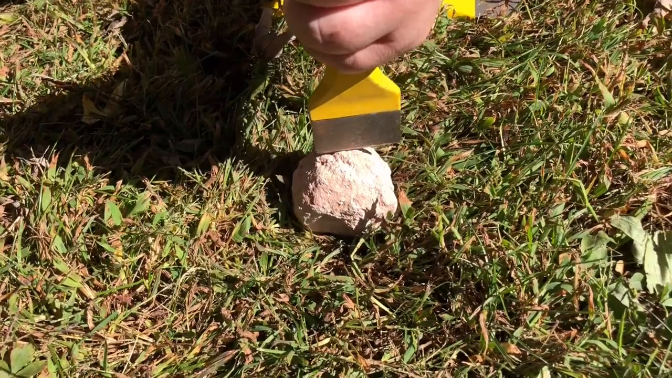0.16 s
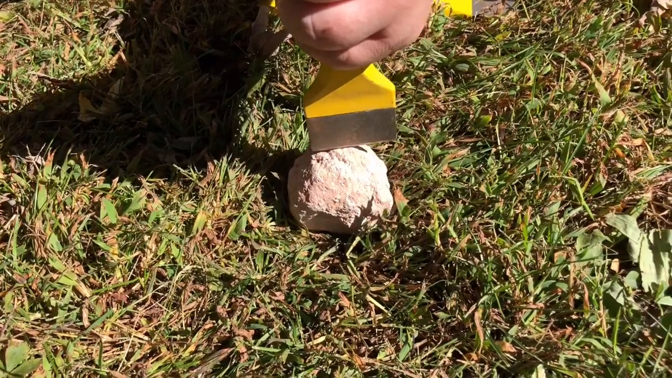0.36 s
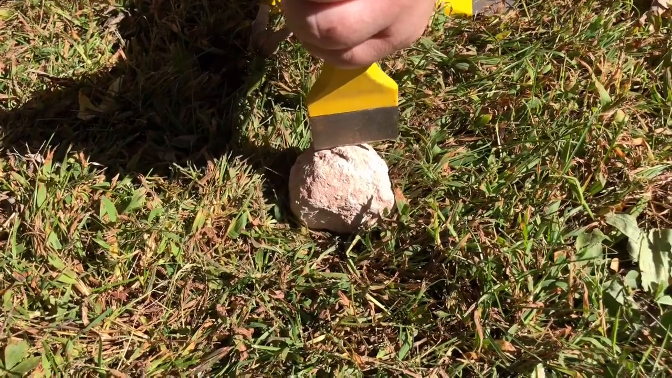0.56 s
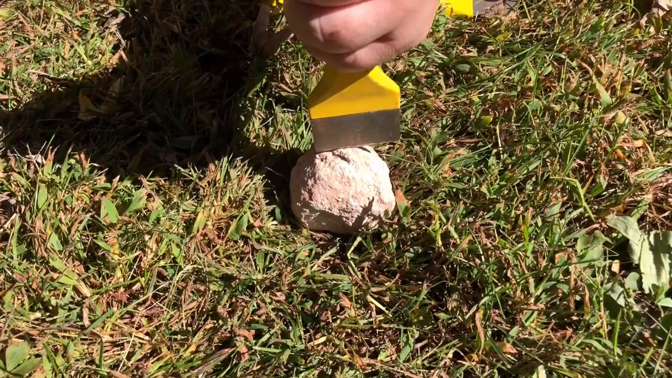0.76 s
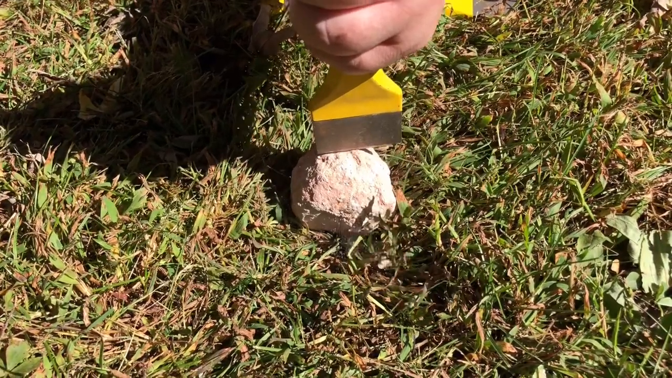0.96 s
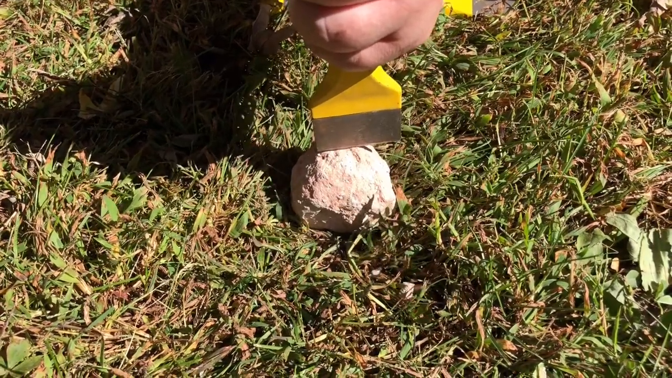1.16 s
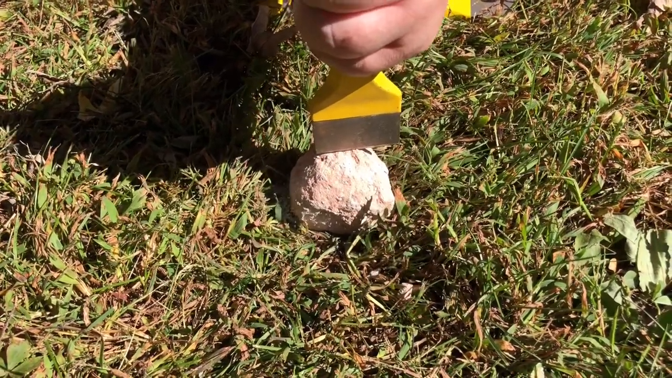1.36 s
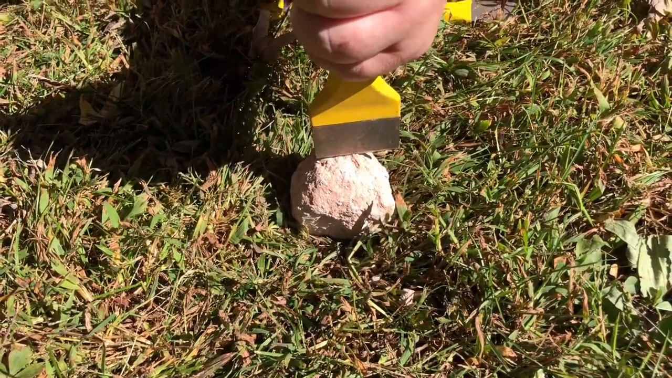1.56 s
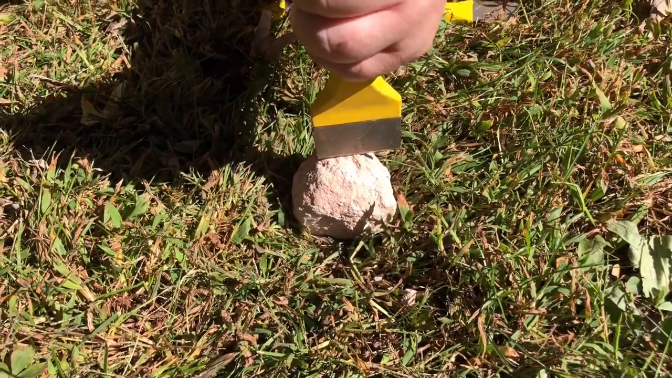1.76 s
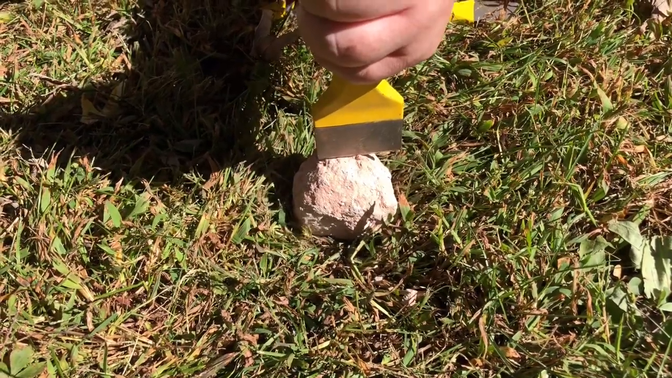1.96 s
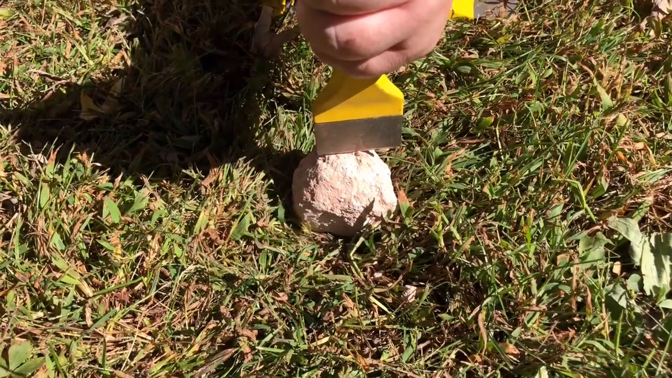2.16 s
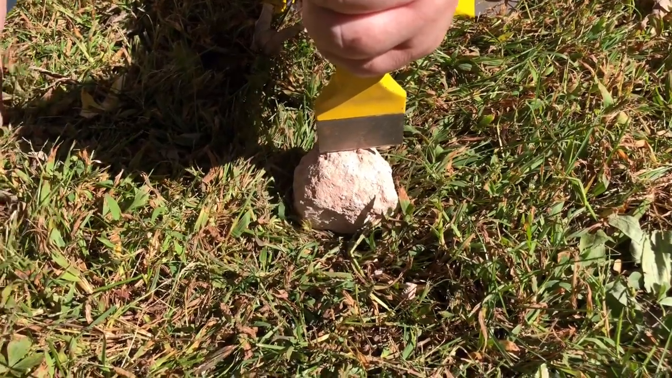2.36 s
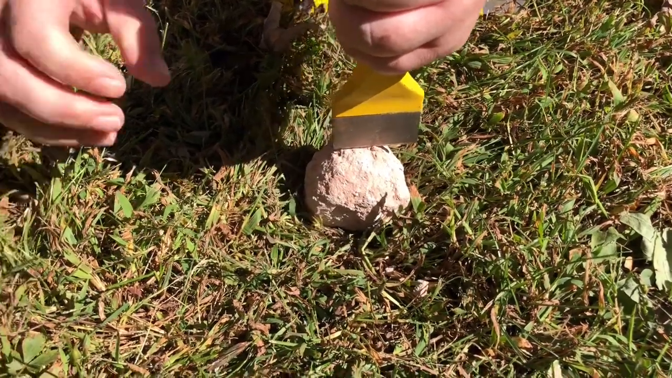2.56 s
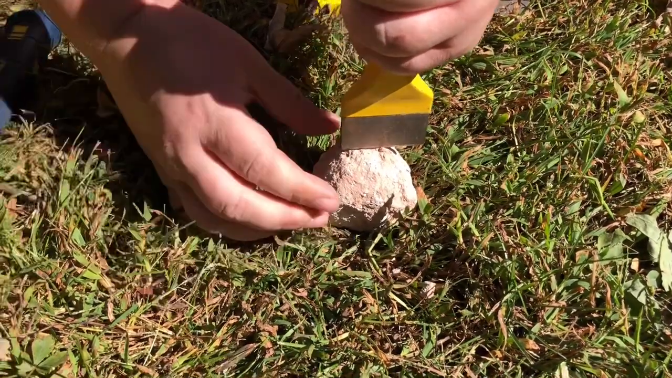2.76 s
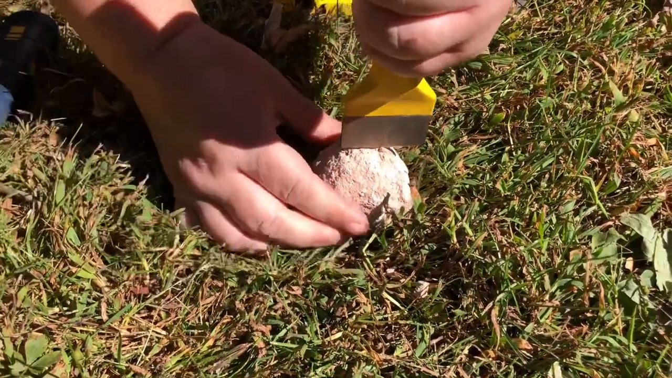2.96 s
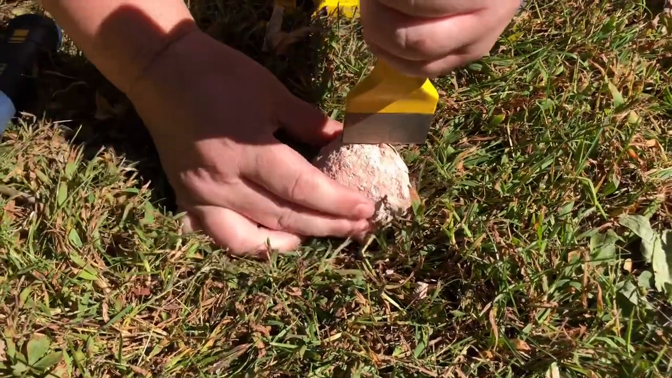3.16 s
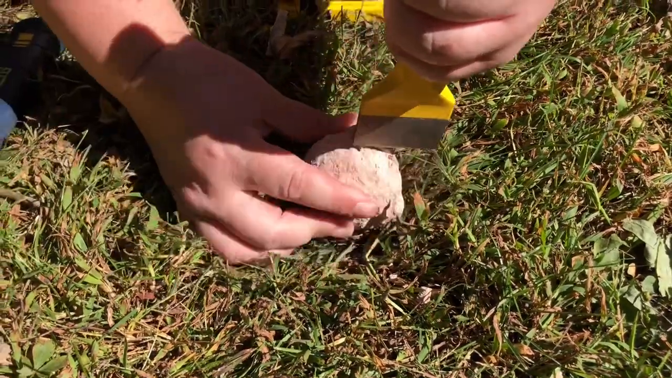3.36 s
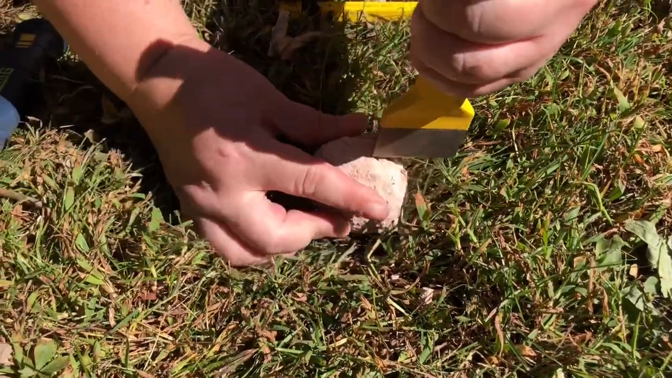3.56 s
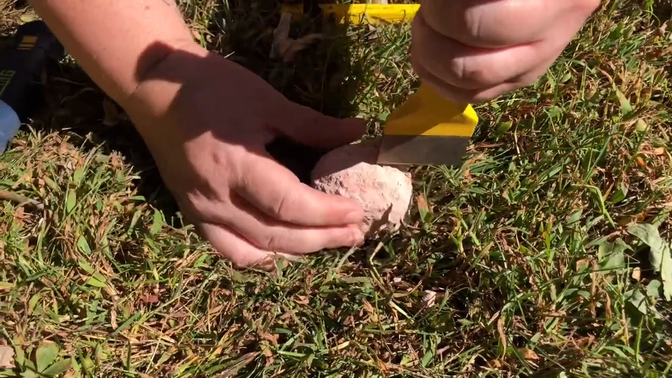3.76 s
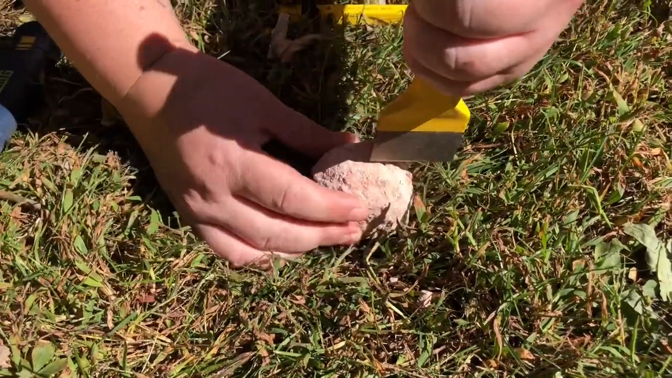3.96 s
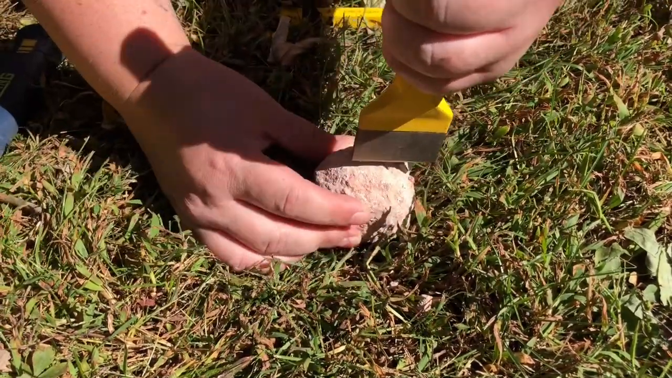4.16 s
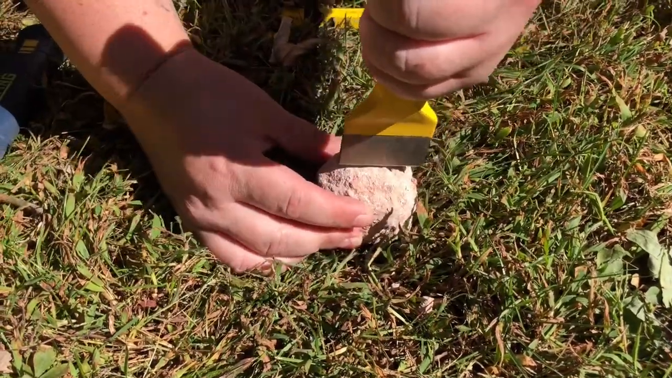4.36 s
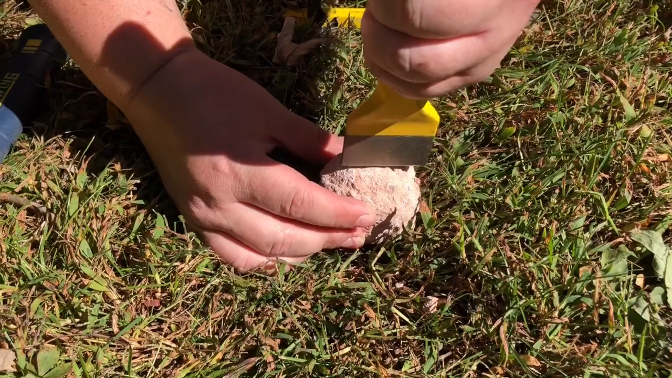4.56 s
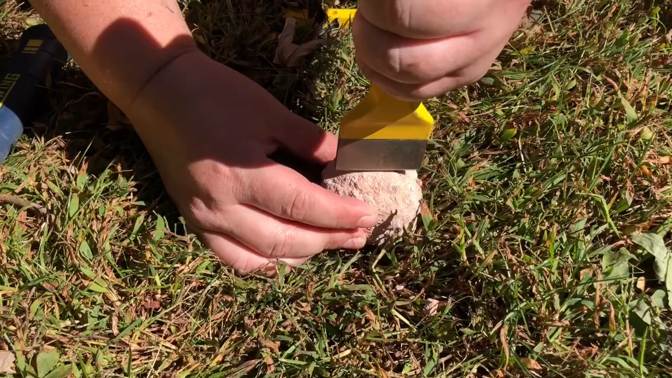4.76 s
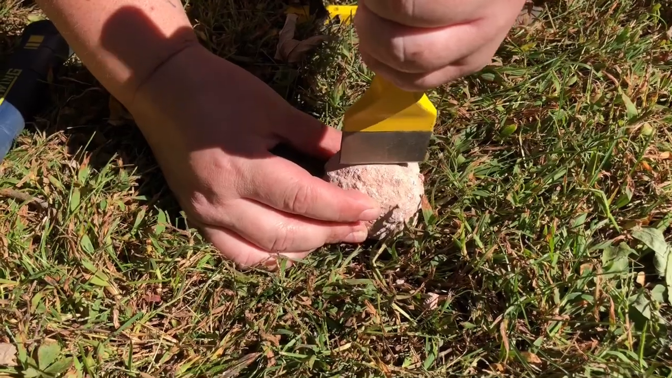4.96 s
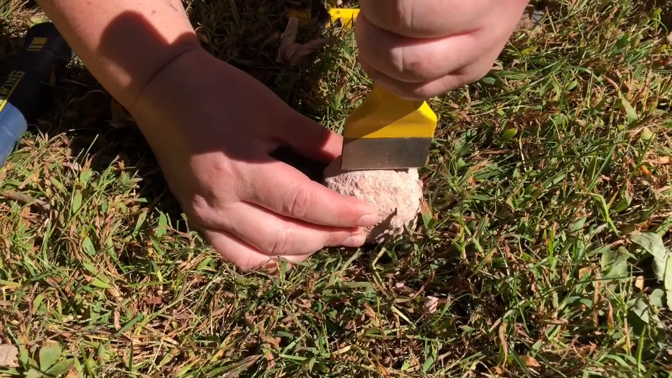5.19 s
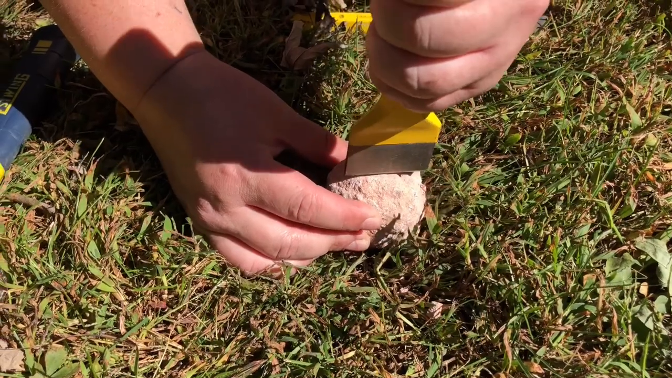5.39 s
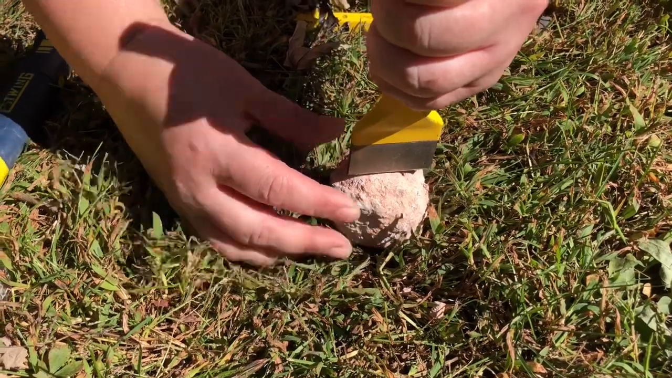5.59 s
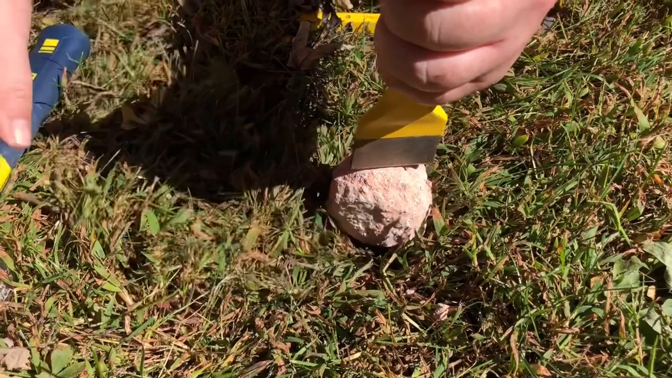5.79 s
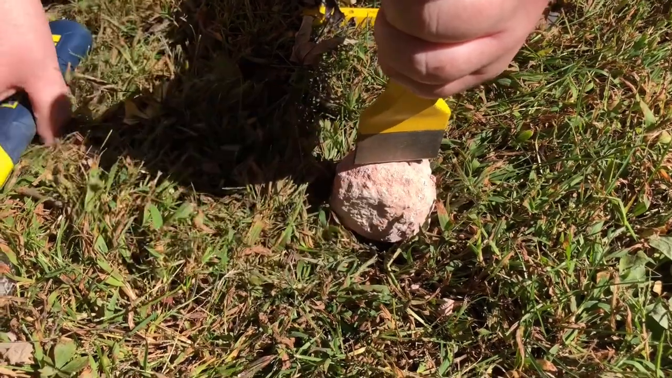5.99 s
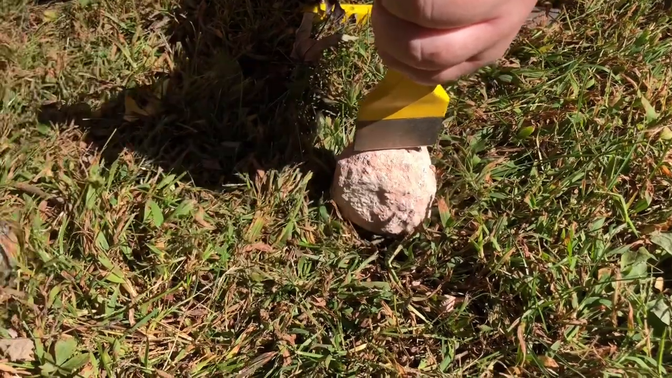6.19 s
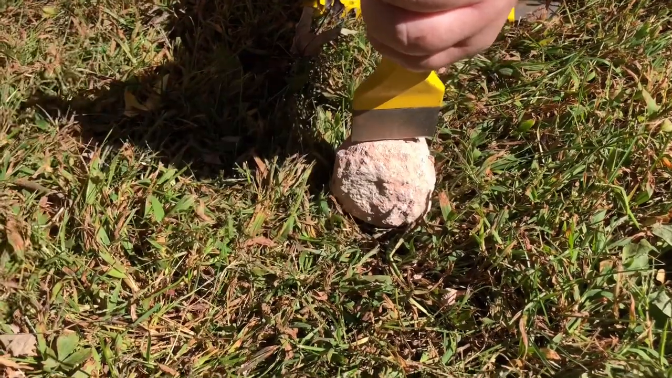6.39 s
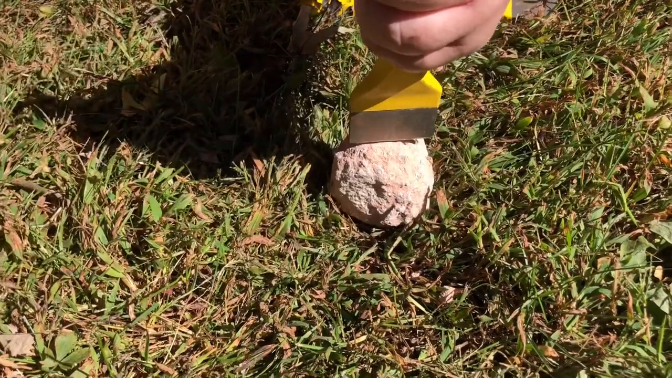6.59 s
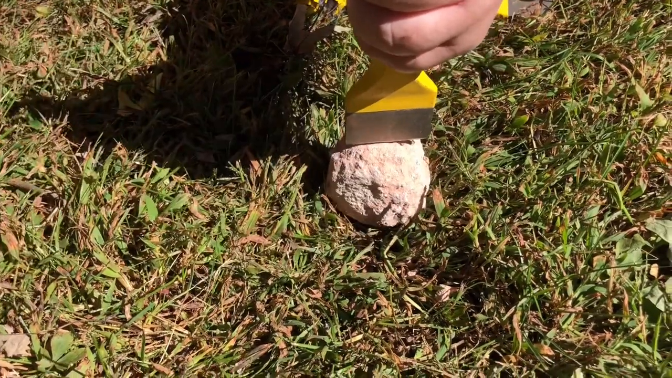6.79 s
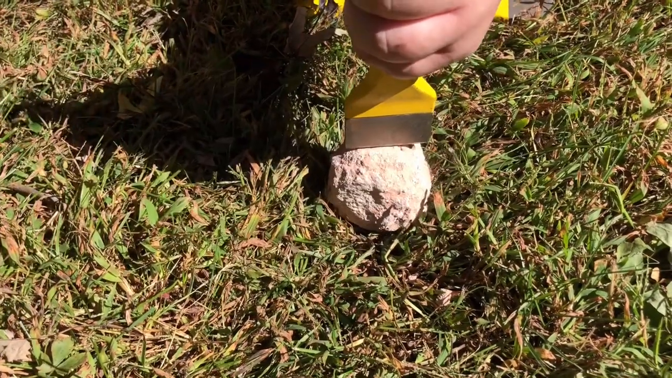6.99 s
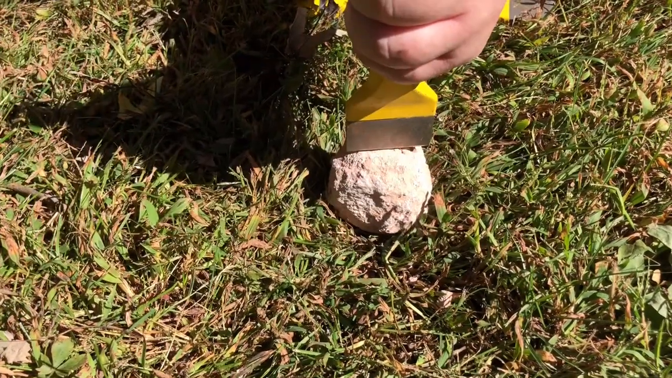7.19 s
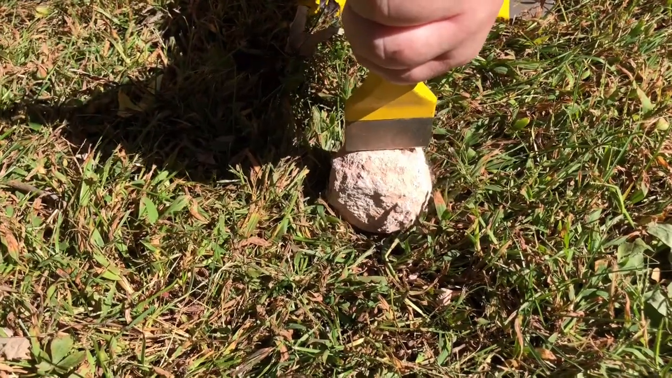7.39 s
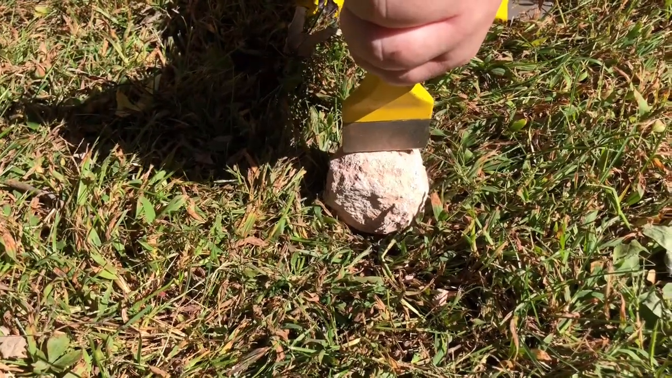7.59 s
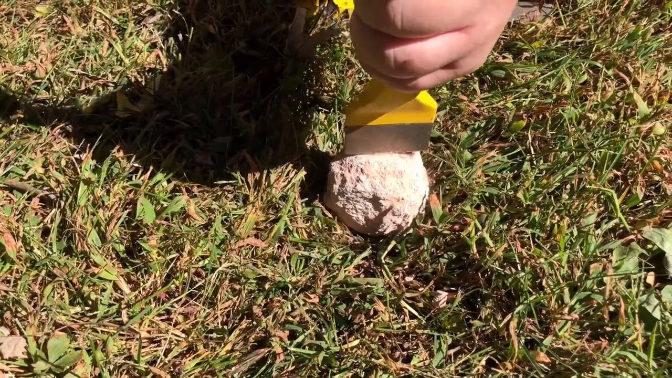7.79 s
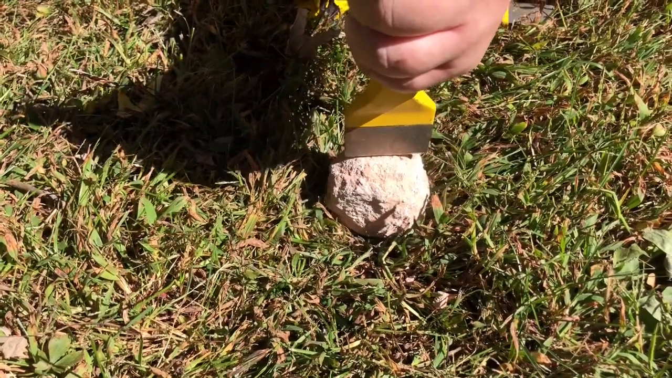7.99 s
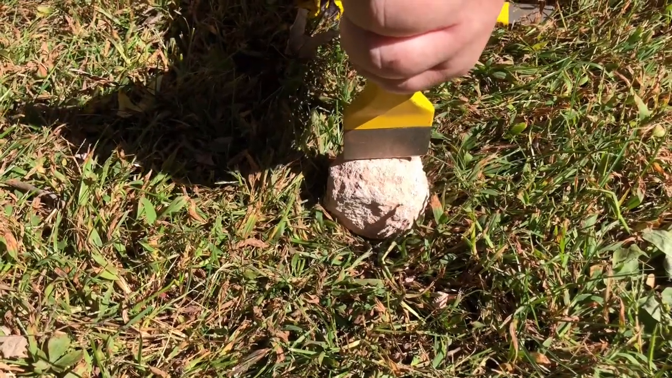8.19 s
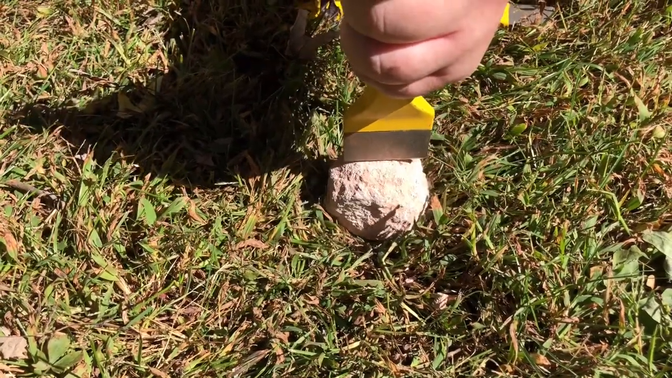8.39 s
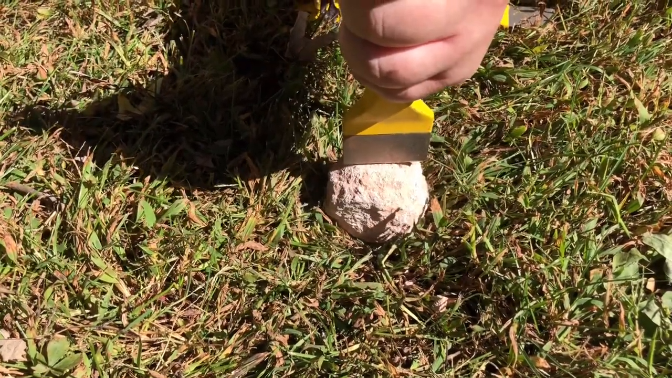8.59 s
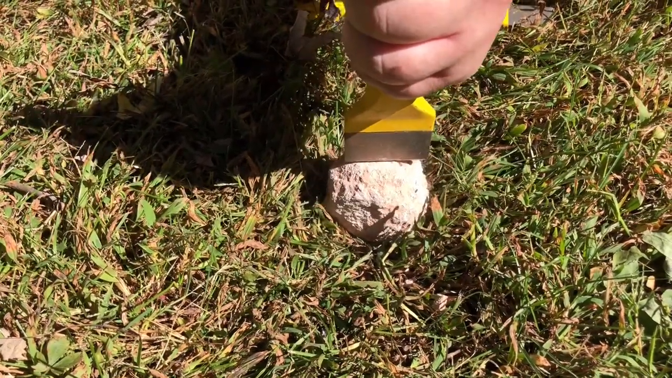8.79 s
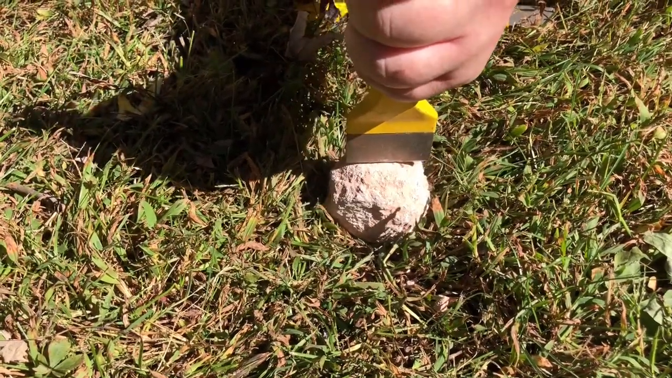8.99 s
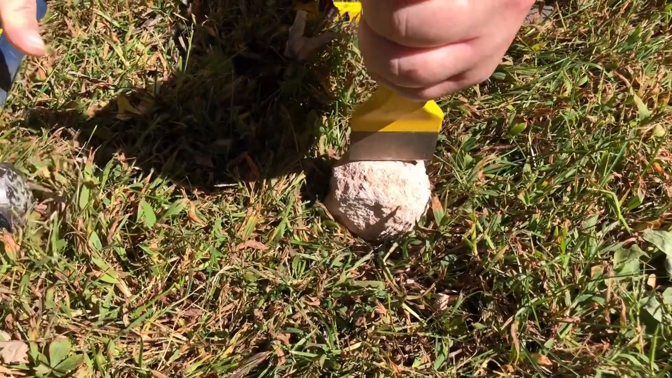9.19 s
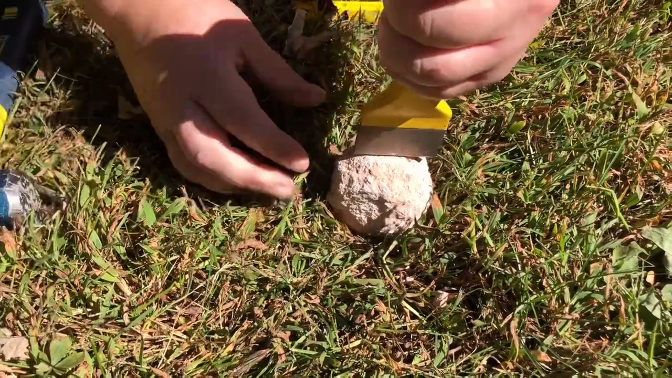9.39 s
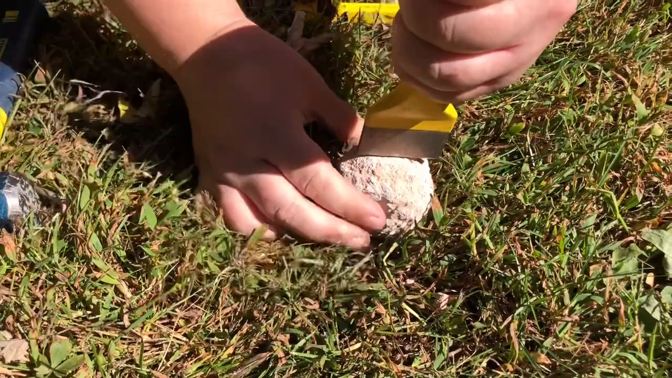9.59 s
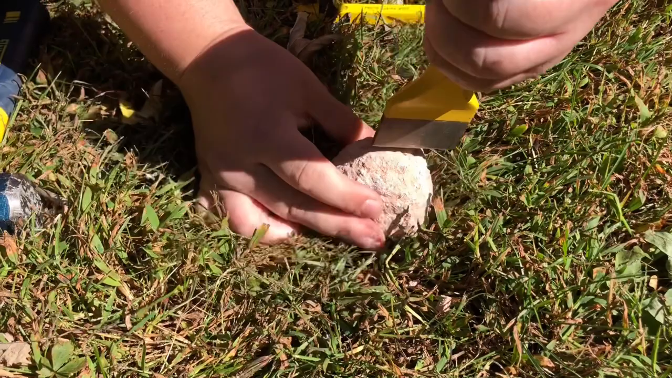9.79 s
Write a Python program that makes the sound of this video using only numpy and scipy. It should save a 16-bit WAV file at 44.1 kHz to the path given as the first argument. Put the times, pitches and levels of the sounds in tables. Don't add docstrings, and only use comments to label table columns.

```python
import sys
import numpy as np
from scipy import signal
from scipy.fft import rfft, irfft
from scipy.io import wavfile
from scipy.ndimage import map_coordinates

SR = 44100
rng = np.random.default_rng(int(sys.argv[2]) if len(sys.argv) > 2 else 0)


def master(y):
    cut = np.clip(np.atleast_2d(y).T, -1, 1)
    pcm = np.round(cut * 32767)
    wavfile.write(sys.argv[1], SR, pcm.astype(np.int16))


def natural_amplitude(level_db):
    exponent = np.asarray(level_db, float) / 20
    return 10 ** exponent


N = 434374

# [f/Hz, level/dB]
TRAFFIC_SPECTRUM = [(20, -39), (35, -25), (55, -8), (105, 0), (190, -8.5), (300, -17), (500, -24),
                    (800, -56)]
# [t/s, level/dB]
TRAFFIC_FLOW = [(0, -45), (.6, -45), (.9, -49), (3.2, -47), (3.65, -53), (4.05, -48.5), (4.6, -47),
                (5.7, -51), (6.2, -47), (7.2, -45.5), (8.4, -48), (9.85, -46)]
# [f/Hz, level/dB]
AIR_SPECTRUM = [(200, -1), (500, 0), (1600, -1.5), (4400, -8), (8000, -6.5), (10000, -26), (12200, -25),
                (13000, -20.5), (13900, -25), (16500, -23.5)]
# [f/Hz, level/dB]
INSECT_SPECTRUM = [(5000, -28.5), (5700, -13.5), (5950, -2.5), (6500, -0.5), (7200, -4), (8200, -16),
                   (8600, -30.5), (9500, -36.5)]
# [t/s, firing f/Hz, level/dB]
ENGINE = [
    (5.9, 135.2, -64),
    (6.15, 131.6, -47.5),
    (6.5, 124, -53),
    (6.75, 106.8, -51.5),
    (7.0, 113.2, -51),
    (7.4, 120.6, -42),
    (7.6, 121.8, -51.5),
    (7.85, 118, -61.5),
]
# [f/Hz, level/dB, start t/s, end t/s]
WHINES = [
    (1314, -71, 0, 4.0),
    (1104, -73, 1.5, 5.5),
    (2290, -71, 3.0, 3.55),
    (2900, -67, 5.18, 5.38),
    (2150, -68, 5.42, 5.7),
    (345, -63, 9.0, 10),
    (2900, -65, 9.75, 10),
]

# [f/Hz, level/dB]
GRASS_SPECTRUM = [(400, -13), (1500, -6.5), (4000, -3), (8000, -5), (12000, 0), (15500, 0), (16500, -17.5)]
# [t/s, held/s, level/dB, swell time per 20 dB/s, fade time per 20 dB/s]
SWEEPS = [(2.405, .2, -52, .03, .04), (2.44, .015, -43.5, .05, .05), (2.62, .1, -64, .02, .02),
          (2.83, .1, -65, .03, .3), (2.91, .05, -63, .2, .5), (3.215, .012, -68, .1, .03),
          (3.51, .03, -57, .2, .07), (3.7, .4, -72, .4, 3), (4.475, .006, -67, .02, .04),
          (4.752, .006, -62, .01, .06), (4.6, 1.0, -76, .5, .3), (5.16, .01, -59, .01, .015),
          (5.75, .05, -58.5, .15, .25), (5.9, .025, -61, .2, .025), (6.03, .06, -52, .04, .3),
          (6.15, .12, -55, .2, .2), (6.3, .14, -52, .3, .08), (9.282, .012, -41, .025, .06),
          (9.26, .01, -57, .03, .03), (9.37, .015, -47, .06, .07), (9.49, .02, -60, .05, .08),
          (9.57, .1, -56, .15, .1), (9.77, .07, -64, .05, .05)]
# [f/Hz, level/dB]
STEM_SPECTRUM = [(1500, -28), (3300, 11), (5000, -10), (6800, -2), (9000, -9), (14000, -4), (16500, 1)]
# [t/s, level/dB, t60/s]
SNAPS = [
    (1.2805, -30, 0.013),
    (2.452, -54, .02),
    (2.72, -51, 0.0038),
    (3.213, -51, .006),
    (4.018, -41, .012),
    (4.7525, -52, .006),
    (6.289, -41.5, 0.0032),
    (6.375, -43, 0.0028),
    (9.2835, -41, .02),
    (9.772, -45, .006),
]
# [t/s, level/dB]
SET_DOWN = [
    (2.359, -49),
    (9.308, -29),
    (9.382, -32),
]

# [t/s, length/s, level/dB, lowest mode level/dB, brightness/dB]
TOUCHES = [
    (2.479, .025, -48.5, -14, -14),
    (3.213, .004, -51, -15.5, -2.1),
    (3.509, 0.054, -46, -12, -14),
    (4.07, 0.033, -56, -3, -7),
    (4.7515, 0.038, -45.5, -5, -5),
    (5.159, .014, -42, -4, -4),
    (6.045, .06, -56, -14, -16),
    (9.772, .004, -50, -8, -4),
    (9.798, .003, -63, -10, -11),
    (9.84, .004, -59, -6, -10),
]
# [f/Hz, t60/s]
BLADE_LOW_MODE = (1870, 0.038)
# [f/Hz, level/dB, t60/s]
BLADE_MODES = [(3735, 4.5, 0.025), (7150, -2.5, .04)]
# [f/Hz, level/dB, t60/s]
BLADE_TOP_MODES = [(8825, -10, .06), (11540, -5, .05), (12640, -16, .15), (14020, -8, .04)]
# [f/Hz, level/dB, t60/s]
STONE_MODES = [(2600, -6, .012), (4150, 0, .01), (4600, -2, .01), (5200, -2, .01)]

# [f/Hz, level/dB]
WALL_SPECTRUM = [(500, -10), (1400, -1.1), (1820, 11), (2300, 2.5), (3000, 7), (4200, -2.5), (5350, 3.5),
                 (6000, -8), (9000, 1.1), (10300, 1.5), (12200, -6), (12680, -18), (14580, -12),
                 (16000, -9)]
# [lag/s, t60/s, level/dB]
ECHOES = [(.012, .2, -41), (0.0415, .03, -29.5), (0.0481, .04, -30.5), (.06, .05, -46), (0.108, .05, -45.5)]
# [f/Hz, level/dB, t60/s, lag/s]
ECHO_BOOM = (1820, -35, .055, .044)

# [f/Hz, level/dB, t60/s]
SOIL_MODES = [(90, 6, .085), (175, -7, .03), (330, -15, .04), (447, -13, .09)]
# [t/s, strength/dB, steel ring over grit/dB, soil thump/dB, gain dip/dB]
BLOWS = [
    (0.0433, -9.5, 5, -27, 0.5),
    (0.5056, -8, 5.5, -21.5, -10),
    (0.9765, -9, 6.5, -22, -7),
    (1.442, -1.5, -2.1, -20, -4),
    (1.9223, -1.5, 2.1, -17.5, -17),
    (7.0552, -10, 2.5, -35, -1),
    (7.4861, -7, 2.2, -22.5, -12),
    (7.9437, -2.5, 3, -19.5, -8),
    (8.3938, -2.1, -4, -15.5, -8),
    (8.8374, -1.1, 3, -13.5, -13),
]
# [rebound lag/ms, rebound/dB, face ring/dB, face overtone/dB]
RECOILS = [
    (8.7, -10, -22.5, -85),
    (3.9, -2.1, -25.5, -41),
    (3.9, -2.1, -23.5, -51),
    (3.8, -18, -31, -33),
    (3.92, -2.1, -27, -48),
    (1.9, -2.1, -30.5, -47),
    (3, -2.5, -26, -39),
    (3.5, -8.5, -20.5, -43),
    (1.7, -2.1, -16.5, -24),
    (1.3, -7, -27, -36),
]
# [f/Hz, level/dB, t60/s]
GRIPPED_MODES = [(5170, -4, .03), (5400, -2, .035), (5620, -8, .025), (7150, -10, .03), (10250, -14, .03),
                 (11600, -18, .03), (12690, -6.5, .03), (14620, -21, .03)]
# [f/Hz, level/dB, t60/s]
FREE_MODES = [(12680, 10, .115), (12720, 4, .1), (14580, 11, .11), (8830, 4, .25)]
# [f/Hz, level/dB]
GRIT_SPECTRUM = [(1200, -21), (2300, -2), (3500, -0.5), (5300, 2), (6500, -2), (8500, -15.5), (13000, -13),
                 (16000, -33.5)]
# [f/Hz, level/dB]
KNOCK_SPECTRUM = [(150, -24), (330, -16), (620, -23), (800, -10), (1000, -6), (1800, -8), (2600, -9.5),
                  (4000, -31.5)]

# [t/s, gain/dB]
GAIN_RIDE = [(0, 0), (.9, 0), (1.12, -2), (1.7, -4.5), (2.03, -3), (2.27, -4), (3.1, -1.5), (5.2, -1.1),
             (5.7, 0), (7.42, 0), (7.6, -3), (8.18, -6), (9.27, -5), (9.5, -2.1), (9.85, 0)]
# [lag/blocks of 512 samples, level/dB]
GHOSTS = [(-2, -30.5), (-1, -35), (2.6, -37.5)]


def in_time(rows):
    s, *columns = np.transpose(rows)
    return [np.interp(np.arange(N) / SR, s, c) for c in columns]


def rms_one(x):
    return x / np.sqrt(np.mean(x ** 2) + 1e-20)


def colour(x, spectrum):
    hz, db = np.transpose(spectrum)
    grid_hz = np.arange(2049) * SR / 4096
    log_gain = np.log(natural_amplitude(np.interp(np.log(grid_hz + 1), np.log(hz), db)))
    cepstrum = irfft(log_gain)
    cepstrum[1:2048] *= 2
    cepstrum[2049:] = 0
    response = irfft(np.exp(rfft(cepstrum)))
    return signal.oaconvolve(x, response)[:len(x)]


def drift(rate_hz):
    knots = rng.standard_normal(1200)
    return map_coordinates(knots, [np.arange(N) / SR * min(rate_hz, 100) + 2], order=3)


def modes(table, scatter_db, detune=0., size=8192):
    hz, db, t60 = np.transpose(table)[:, :, None]
    t = np.arange(size) / SR
    strength, pitch, sign = rng.standard_normal((3, len(table), 1))
    hz = hz * (1 + detune * pitch)
    envelope = natural_amplitude(db + scatter_db * strength - 60 * t / t60)
    return np.sum(np.sign(sign) * envelope * np.sin(2 * np.pi * hz * t), axis=0)


def burst(spectrum, envelope):
    puff = colour(rng.standard_normal(len(envelope)), spectrum) * envelope
    pulse = colour(np.arange(len(envelope)) == 0, spectrum)
    energy = np.linalg.norm(envelope)
    return np.array([v * energy / np.linalg.norm(v) for v in (puff, pulse)])


def add(track, s, sound):
    i = round(s * SR)
    track[i:i + len(sound)] += sound[:N - i]


def background():
    air_db, insects_db = -55, -58.5
    t = np.arange(N) / SR
    traffic_db, = in_time(TRAFFIC_FLOW)
    white = rng.standard_normal((3, N))
    traffic = natural_amplitude(traffic_db + 1 + 0.5 * drift(8)) * rms_one(colour(white[0], TRAFFIC_SPECTRUM))
    air = natural_amplitude(air_db + 0.47 * drift(10)) * rms_one(colour(white[1], AIR_SPECTRUM))
    insects = natural_amplitude(insects_db + 0.7 * drift(35)) * rms_one(colour(white[2], INSECT_SPECTRUM))

    firing_hz, engine_db = in_time(ENGINE)
    phase = 2 * np.pi * np.cumsum(firing_hz * (1 + 0.015 * drift(9.2))) / SR
    engine = np.sin(phase) + natural_amplitude(-10) * np.sin(2 * phase)
    engine = engine * natural_amplitude(engine_db + 0.5 + 0.89 * drift(14))

    whines = np.zeros(N)
    for hz, db, start, end in WHINES:
        level = natural_amplitude(db + 2.5 + 3.1 * drift(15))
        gate = np.clip(np.minimum(t - start, end - t) / 0.065, 0, 1)
        whines += level * gate * np.sin(2 * np.pi * hz * t + 1.9 * drift(10))
    return traffic + air + insects + engine + whines


def soil(db):
    t = np.arange(8192) / SR
    swing = sum(natural_amplitude(g - 60 * t / t60) * np.sin(2 * np.pi * hz * t) for hz, g, t60 in SOIL_MODES)
    return natural_amplitude(db) * swing * (1 - np.exp(-t / 0.0015))


def grass():
    t = np.arange(N) / SR
    power = np.zeros(N)
    for s, held, db, swell, fade in SWEEPS:
        before, after = np.maximum(s - t, 0), np.maximum(t - s - held, 0)
        power += natural_amplitude(db - 20 * before / swell - 20 * after / fade) ** 2

    snaps_per_s = 4000
    sizes = natural_amplitude(4.8 * np.minimum(rng.exponential(1, N), 5)) * rng.choice([-1, 1], N)
    grains = rms_one(sizes * (rng.random(N) < snaps_per_s / SR))
    rustle = rms_one(colour(grains + 1.3 * rng.standard_normal(N), GRASS_SPECTRUM))
    out = np.sqrt(power) * natural_amplitude(2.5 + 1.6 * drift(60)) * rustle

    for s, db, t60 in SNAPS:
        stem = rms_one(colour(rng.standard_normal(2048), STEM_SPECTRUM))
        add(out, s, stem * natural_amplitude(db - 60 * np.arange(2048) / SR / t60))
    for s, db in SET_DOWN:
        add(out, s, soil(db))
    return out


def touches():
    clicks_per_s = 500
    stone_db, stone_db_per_s = 9, -550
    out = np.zeros(N)
    for s, length, db, low_db, bright_db in TOUCHES:
        chance, size = rng.random((2, 4000))
        clicks = (chance < clicks_per_s / SR) * natural_amplitude(-3 - 10 * size)
        clicks = clicks * (np.arange(4000) < length * SR)
        clicks[0] = 1
        low_hz, low_t60 = BLADE_LOW_MODE
        body = modes(BLADE_MODES + [(low_hz, low_db, low_t60)], 1.3, size=4096)
        body += natural_amplitude(bright_db) * modes(BLADE_TOP_MODES, 1.5, size=4096)
        body += natural_amplitude(stone_db + stone_db_per_s * length) * modes(STONE_MODES, 1.4, size=4096)
        add(out, s, natural_amplitude(db) * signal.oaconvolve(clicks, body))
    return out


def yard(x):
    tail_db, tail_t60_s, tail_top_hz = -38, 0.65, 7500
    return_db, flutter_db = -22.5, 0.8
    t = np.arange(SR // 2) / SR
    white = rng.standard_normal((2, SR // 2))
    shape = sum(natural_amplitude(db - 60 * np.maximum(t - lag, 0) / t60) * (t > lag) for lag, t60, db in ECHOES)
    tail = natural_amplitude(tail_db - 60 * (t - 0.045) / tail_t60_s) * (t > 0.043) * white[1]
    tail = signal.lfilter(*signal.butter(1, tail_top_hz, fs=SR), tail)
    response = colour(white[0] * shape + tail, WALL_SPECTRUM)
    hz, db, t60, lag = ECHO_BOOM
    boom_t = t[:4096]
    add(response, lag, natural_amplitude(db - 60 * boom_t / t60) * np.sin(2 * np.pi * hz * boom_t))
    return signal.oaconvolve(x, response * natural_amplitude(return_db))[:N] * natural_amplitude(flutter_db * drift(100))


def blows():
    soil_lag_s = 0.0161
    blade_under_face_db = -40
    knock_db, knock_follows = -13.5, 0.45
    dulling, mean_blow_db = 0.6, -6
    steel, ground = np.zeros((N, 2)), np.zeros(N)
    t = np.arange(8192) / SR
    for (s, db, ring_db, soil_db, dip_db), recoil in zip(BLOWS, RECOILS):
        lag_ms, rebound_db, face_db, overtone_db = recoil
        free_db = face_db, face_db, overtone_db, face_db + blade_under_face_db
        free = [(hz, g + own, t60) for (hz, g, t60), own in zip(FREE_MODES, free_db)]
        wobble_db = 2.5 * np.interp(t, np.arange(40) * 0.005, rng.standard_normal(40))
        ring = modes(free, scatter_db=0) * natural_amplitude(dip_db * t / 0.1 + wobble_db)
        ring = ring * (1 - np.exp(-t / 0.0004))
        add(steel, s, ring[:, None])

        treble = [(7000, 0), (11000, -dulling * (db - mean_blow_db))]
        for lag, gain_db in ((0, 0), (lag_ms / 1000, rebound_db)):
            grit = burst(GRIT_SPECTRUM, natural_amplitude(5 - 60 * t / 0.006) + natural_amplitude(-2 - 60 * t / 0.02))
            gripped = modes(GRIPPED_MODES, scatter_db=1.5, detune=0.008)
            gripped = gripped * natural_amplitude(ring_db + dip_db * t / 0.008)
            knock = burst(KNOCK_SPECTRUM, natural_amplitude(knock_db + knock_follows * db - 60 * t / 0.033))
            crack = np.array([colour(v, treble) for v in gripped + grit])
            blow = natural_amplitude(gain_db) * (natural_amplitude(db - 3) * crack + knock)
            blow[0] *= 1 - np.exp(-t / 0.00017)
            blow[1] *= natural_amplitude(1.5) * (lag == 0)
            add(steel, s + lag, blow.T)
        add(ground, s + soil_lag_s, soil(soil_db))
    return steel.T, ground


def scene():
    (steel, all_round), ground = blows()
    return (steel + ground + yard(all_round) + touches() + grass() + background())[None]


def top_cut(x):
    return signal.sosfilt(signal.butter(12, 16890, fs=SR, output="sos"), x)


def record(dry):
    cutoff_hz, rumble_hz = 16100, 38
    dip_lag_s, dip_spread_s = 0.011, 0.003
    smear_db, smear_t60_s = -44, 0.035
    x = signal.sosfilt(signal.cheby2(18, 50, cutoff_hz, fs=SR, output="sos"), dry)
    x = signal.sosfilt(signal.butter(2, rumble_hz, "high", fs=SR, output="sos"), x)

    t = np.arange(2048) / SR
    gain_db, = in_time(GAIN_RIDE)
    for s, *_, depth_db in BLOWS:
        add(gain_db, s, depth_db * np.exp(-0.5 * ((t - dip_lag_s) / dip_spread_s) ** 2))
    x = np.clip(x * natural_amplitude(gain_db), -1, 1)[0]

    highs = signal.sosfilt(signal.butter(1, 1200, "high", fs=SR, output="sos"), x)
    mids = signal.sosfilt(signal.butter(2, [900, 3500], "band", fs=SR, output="sos"), x)
    smear = rng.standard_normal(len(t)) * natural_amplitude(smear_db - 60 * t / smear_t60_s)
    x = x + signal.oaconvolve(mids[::-1], smear)[:N][::-1]
    padded = np.pad(highs, (0, 1024))
    for blocks, db in GHOSTS:
        x = x + natural_amplitude(db) * np.roll(padded, int(blocks) * 512)[:N]
    return top_cut(x[None])


dry = scene()
out = record(dry)
master(out)
```